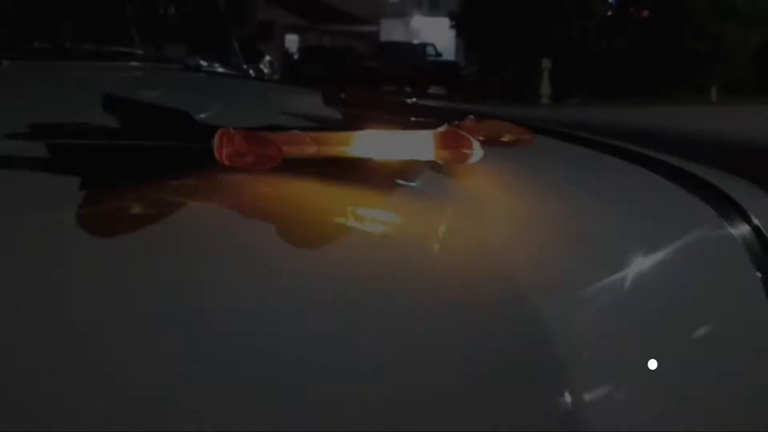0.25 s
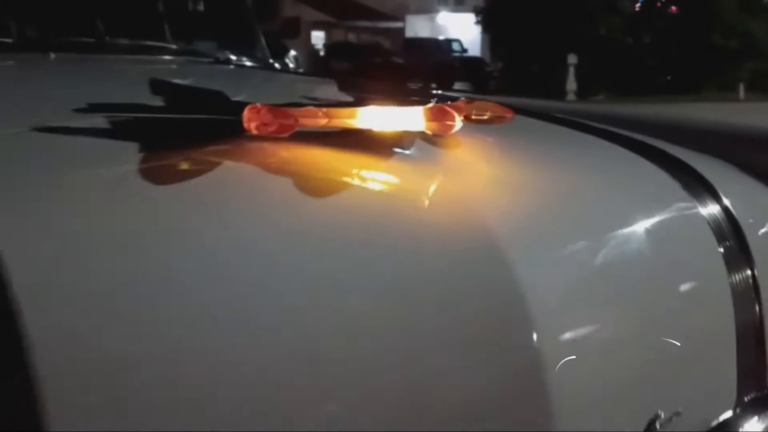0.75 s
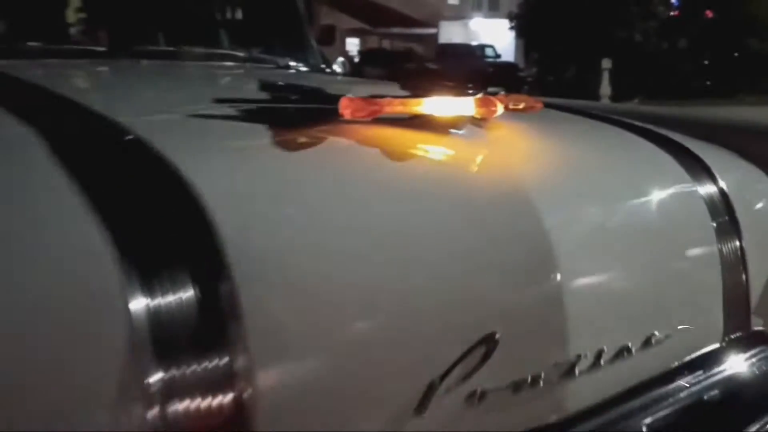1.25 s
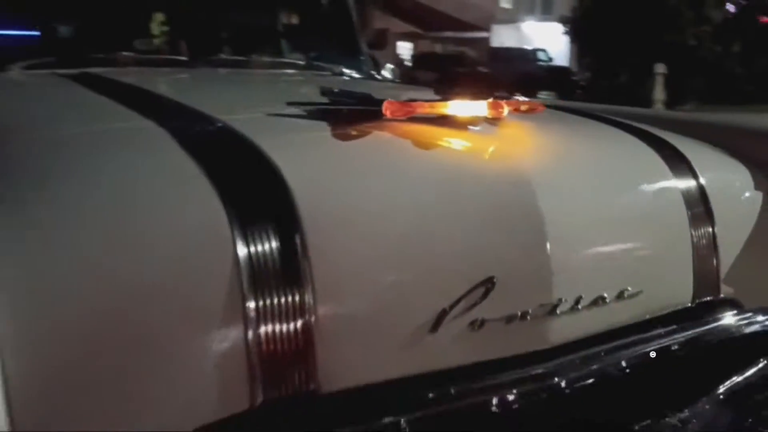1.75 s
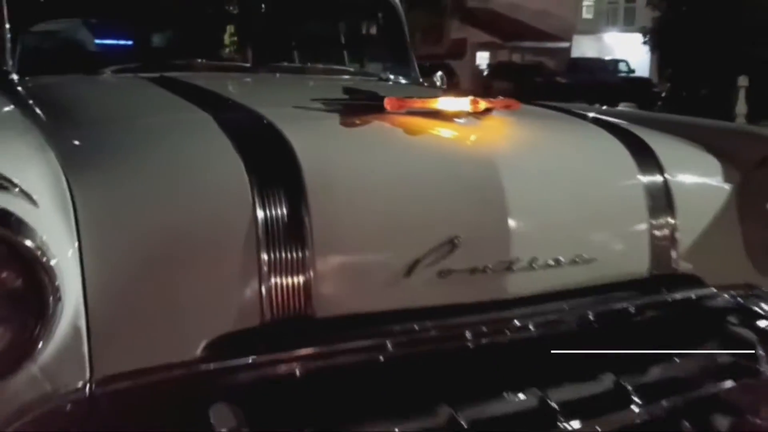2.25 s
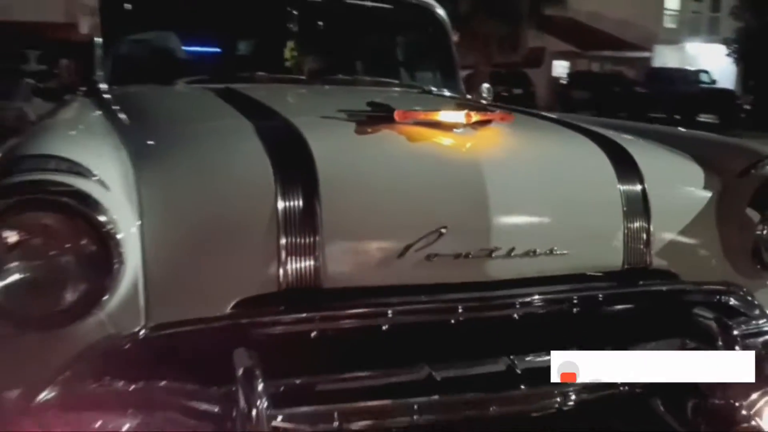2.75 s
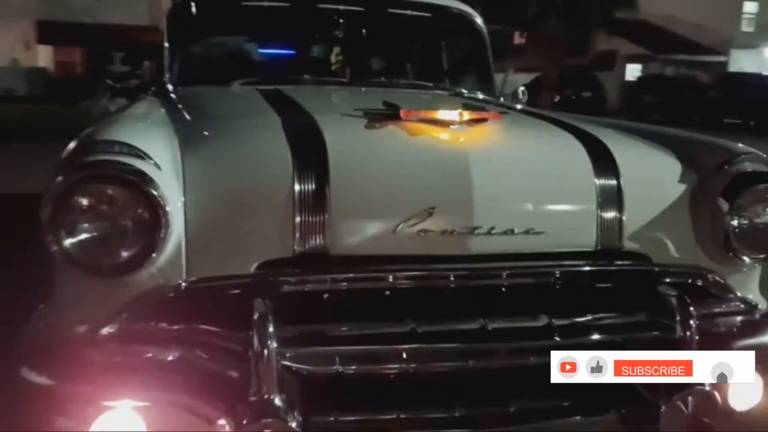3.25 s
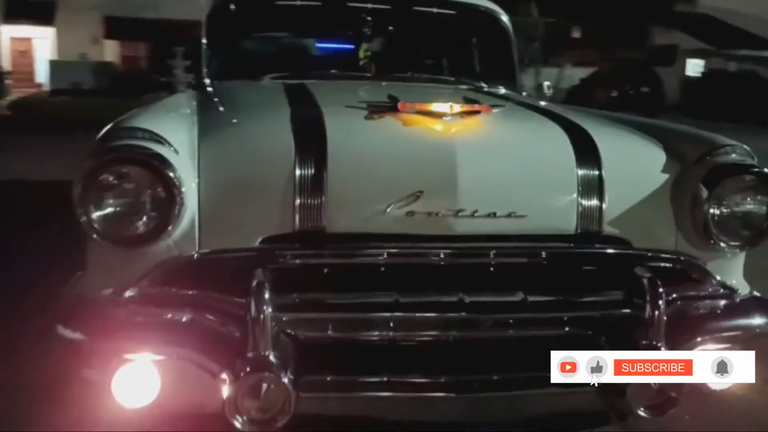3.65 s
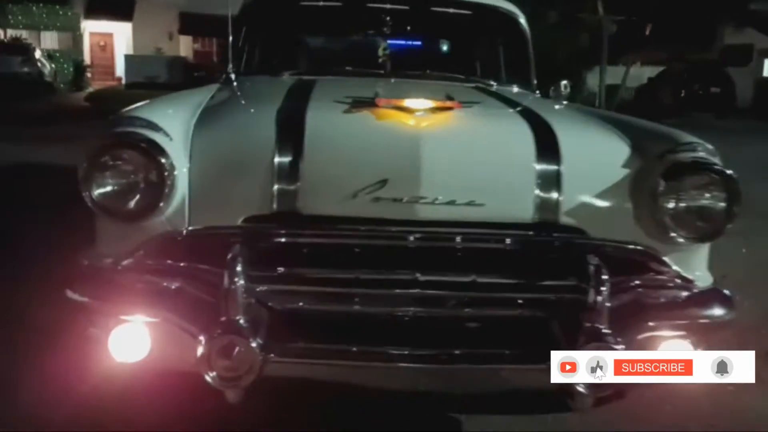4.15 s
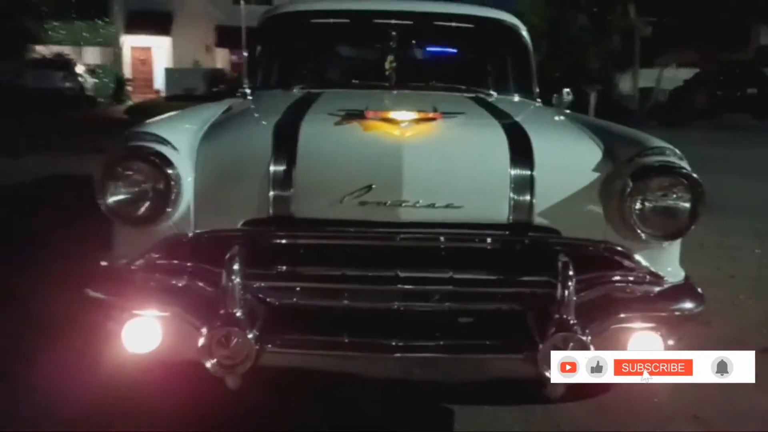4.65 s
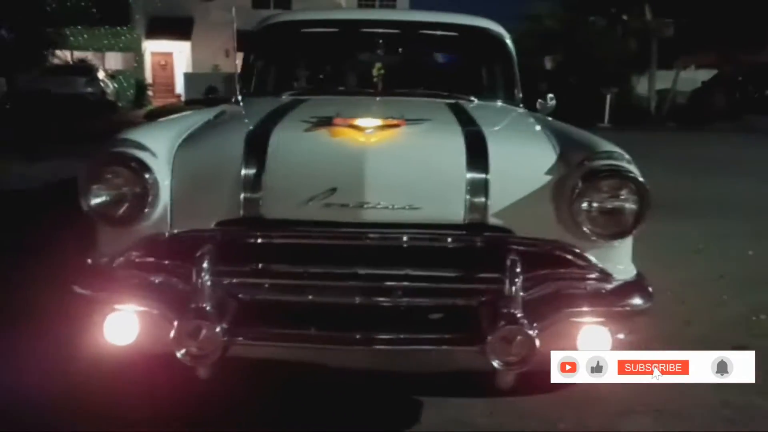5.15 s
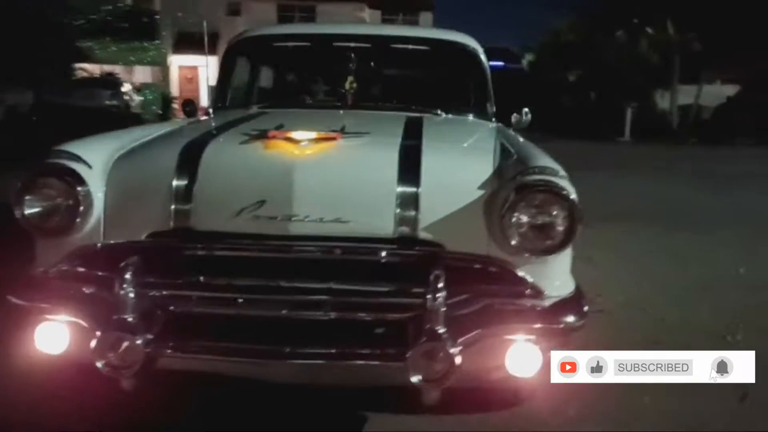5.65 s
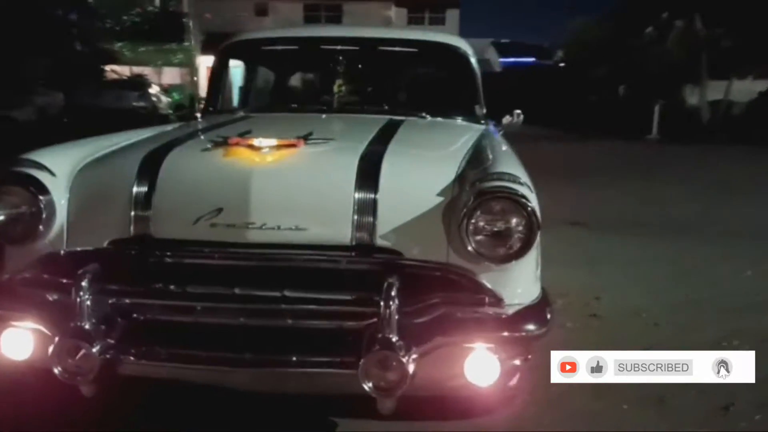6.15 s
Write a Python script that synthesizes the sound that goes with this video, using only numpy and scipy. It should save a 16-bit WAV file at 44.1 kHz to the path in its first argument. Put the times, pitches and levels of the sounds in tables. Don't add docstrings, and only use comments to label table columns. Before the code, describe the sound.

Outdoors at night, an old eight-cylinder engine idles throughout, heard by a hand-held stereo microphone close to the grille. The sound fades in over roughly the first half second, with a sharp isolated click near 0.3 s. Low exhaust pulses repeat about five lumpy cycles a second, some strong, some almost missing, beneath steady fan and intake roar, airy hiss and very faint belt whistle. Around 0.8 s a tight cluster of bright pebble ticks and grit crunches occurs. The engine is nearest until about 1.3 s, then gradually recedes. Near 1.5 s a second motor's low, buzzing drone emerges from behind the car, strongest around 3-4 s, then weakening and sinking slightly. Soft scuffs and clicks gather from 2.5 to 3.2 s with dull handling rumble; the hardest stone snap comes at 3.75 s, more ticks near 4.6 s and 5.7 s. The idle continues to the end at 6.4 s.

```python
import sys
import numpy as np
from scipy import signal
from scipy.io import wavfile

SR = 44100
rng = np.random.default_rng(int(sys.argv[2]) if len(sys.argv) > 2 else 0)


def bounce(signal):
    frames = np.transpose(np.atleast_2d(signal))
    limited = np.clip(frames, -1, 1)
    pcm = np.round(limited * 32767).astype(np.int16)
    wavfile.write(sys.argv[1], SR, pcm)


def volts(x):
    e = np.asarray(x, float) / 20
    return 10 ** e


N = 283077

HANDLING_DB, HANDLING_HZ, HANDLING_S, HANDLING_WIDTH_S = -41, 45.6, 2.8, 0.49

# (time [s], shaft rate [turns/s])
SHAFT_SPEED = [(0, 23.36), (.4, 24.14), (.8, 23.29), (1.2, 23.89), (1.6, 24.87), (2, 24.42), (2.3, 23.72),
               (2.6, 23.4), (2.9, 23.85), (3.2, 24.34), (3.5, 23.85), (3.8, 23.85), (4.2, 23.59),
               (4.7, 23.41), (5.1, 23.47), (5.5, 23.07), (5.9, 22.75), (6.42, 22.48)]
# (time [s], level [dB])
SHAFT_LOAD = [(0, 0), (1.6, -1), (2.4, 0), (2.9, 3), (4.0, 3.5), (4.6, 1.5), (5.1, .5), (5.6, -2.5),
              (6.42, -3)]
# (multiple of the shaft rate [-], level [dB], polarity [+-1], share hidden by the car [-])
BUZZ = [(2, -12, 1, 1), (5, 0, 1, 1), (6, -3.5, -1, 1), (7, -7.5, -1, 1), (8, -1, 1, .2)]
SHAFT_START_TURNS, BOOM_ORDER = .795, 4
BUZZ_DB, BOOM_DB = -33.5, -30.5
BUZZ_HIDDEN_DB, BOOM_HIDDEN_DB = -12, -7
CLEAR_S, CLEARING_S = 1.5, 0.1

# (time [s], bright [dB], dull [dB], thud [dB], size as pitch ratio [-])
SNAPS = [(.674, -40, -14, -40, 0.87), (0.775, 1, -40, -40, 0.8), (.786, -4, -40, -40, 1.05),
         (.802, 4, -40, -40, 0.86), (.824, -6, -10.5, -40, .95), (1.067, -40, -13, -40, .95),
         (2.143, -40, -22, -40, 0.63), (2.5124, -30, -2, -30, .82), (2.763, 1, -32, -40, 1.3),
         (2.895, -1, -40, -40, 1.05), (3.089, -40, -17, -40, .66), (3.192, -40, -17, -40, 0.59),
         (3.237, -40, -14, -40, .6), (3.7547, 11, 4.5, -1, 1.0), (3.964, -3, -40, -40, 0.88),
         (4.574, -40, -11, -40, .7), (4.598, 7, -24, -40, .97), (4.616, -3, -40, -40, 1.02),
         (4.724, 1, -40, -40, 1), (4.738, -1, -40, -40, 0.91), (5.714, 1, -40, -40, 1.0)]
# (frequency [Hz], level [dB], 60 dB decay time [s])
PEBBLE_BRIGHT = [(2600, -18, .004), (4400, -17, .004), (6800, -6, .005), (8300, 0, .0045),
                 (11500, -6, .004), (14000, -17, .004)]
# (frequency [Hz], level [dB], 60 dB decay time [s])
PEBBLE_DULL = [(900, 0, 0.007), (1150, 5, 0.0041), (1440, -1.5, 0.005)]
# (frequency [Hz], level [dB], 60 dB decay time [s])
PEBBLE_THUD = [(190, 13, .014)]
SNAP_LEAD = 14
# (time [s], length [s], level [dB], centre frequency [Hz])
SCUFFS = [(0.765, 0.046, -25.5, 7960), (0.794, 0.044, -24.5, 8400), (0.816, 0.06, -32, 8740),
          (2.556, 0.18, -33, 6300), (2.657, 0.18, -31, 5700), (2.874, 0.19, -36, 7900),
          (3.196, 0.17, -33, 6900), (3.856, .05, -35, 8000), (3.945, 0.16, -28, 8650),
          (4.389, 0.1, -32, 7700), (4.705, 0.12, -38, 7900), (5.657, 0.11, -29.5, 8450),
          (6.127, 0.15, -39.5, 1380), (6.259, 0.094, -43, 1380), (4.3, 0.24, -37, 3650)]

# (frequency [Hz], width [Hz], level [dB])
WHISTLES = [(1177, 45, -51), (1330, 60, -55), (1460, 60, -57), (3651, 14, -60), (5708, 70, -55)]
BELT_LAG = -11
# (frequency [Hz], density [dB per Hz])
ROAR = [(25, -62), (60, -58), (85, -55), (103, -56), (125, -55.5), (145, -55), (200, -57.5), (228, -55),
        (260, -58.5), (320, -55), (355, -55.5), (385, -66.5), (420, -65), (460, -62.5), (510, -62),
        (570, -58), (650, -60.5), (900, -60), (1080, -68.5), (1500, -69), (2000, -75)]
# (frequency [Hz], density [dB per Hz])
HISS = [(1800, -75), (2400, -72), (3200, -72.5), (4200, -70.5), (5500, -69), (7000, -64.5), (8500, -66.5),
        (10500, -71), (16500, -77.5)]
# (frequency [Hz], left-right likeness [0..1])
LIKENESS = [(30, .9), (100, .93), (250, .86), (350, .9), (400, .86), (450, .72), (600, .62), (750, .43),
            (900, .38), (1000, .2), (1250, .32), (1500, .25), (2200, .45), (2800, .22), (3600, .14),
            (4600, .25), (6500, .2), (9000, .03)]
# (frequency [Hz], further lag of the left port [samples])
BEARING = [(140, 3), (240, -3), (360, 4), (450, 1), (560, -6), (750, -4), (950, -2), (1150, -10),
           (1400, -14), (1500, 13), (2400, 10), (4400, 11)]

# (crank angle [degrees of 720], level [dB])
CYLINDERS = [
    (19.8, -2.2),
    (123.7, -6.5),
    (201.6, 1.7),
    (308.1, 4.9),
    (409.2, 1.0),
    (464.3, 5.9),
    (558.7, -12.8),
    (647.0, -1.7),
]
# (frequency [Hz], width [Hz], level [dB])
EXHAUST = [(41.6, 4, -29), (83.6, 4, -8.5), (103.6, 5.5, -0.8), (135.6, 13, -23), (155.5, 5, -11),
           (171.4, 4, -17), (199.4, 2.5, -19.5), (210.3, 3, -14), (235.7, 25, -30), (309.3, 3, -22)]
EXHAUST_SIGNS = [1, -1, 1, -1, 1, -1, 1, -1, 1, -1]
CYCLES_PER_S, FIRST_CYCLE = 5.241, .013
# (time [s], lead [cycles])
HUNT = [(0, 0), (.4, .008), (.8, .008), (1.05, .014), (1.3, .004), (1.65, -.016), (2.2, -.003), (2.6, .002),
        (3.1, .018), (3.35, .013), (3.85, -.008), (4.1, 0), (4.5, .009), (5.05, .006), (5.3, .01),
        (6.0, .002), (6.42, 0)]
INTAKE_HZ, INTAKE_WIDTH_HZ, INTAKE_DB, INTAKE_S, INTAKE_NEAR_S = 309.3, 3, -24, .6, .5
FIRING_HZ, FIRING_GAIN_DB, FIRING_FROM_S, FIRING_RISE_S = 83.6, 8, 4.0, .2

# (time [s], gain [dB])
RETREAT = [(0, -4), (.5, -0.5), (.85, 1.5), (1.05, 0.5), (1.3, 1.5), (2.1, -2), (2.6, -2), (3.2, -4.5),
           (3.6, -4.5), (3.9, -6), (4.5, -5), (5.0, -6), (5.6, -6.5), (6.42, -6.5)]
EXHAUST_DB, ROAR_DB, HISS_DB, WHISTLE_DB = -18, -29, -30, 7.5
ROAR_FOLLOWS, HISS_FOLLOWS = 0.35, 0.11
DULL_HZ, DULL_FOLLOWS = 10800, 0.69
FACING_S, FACING_WIDTH_S, FACING_DB = 2.95, 0.48, 2.0
LOWS_FROM_DB, LOWS_FADE_S = -5.5, 0.24
NOISE_FROM_DB, NOISE_FADE_S = -10, 0.42

# (frequency [Hz], width [Hz], level [dB])
LEFT_PORT = [(397, 96, 1.9), (536, 120, -1), (1960, 300, 0.8), (3090, 680, 6.5), (8650, 940, 6.5),
             (13700, 7100, -9), (15600, 1000, -3)]
LEFT_LAG = 50
JUMP_S, JUMP_DB = .275, [[-13.5], [-18]]
JUMP_FADE_S, JUMP_EDGE_S = .0016, .00007
CUTOFF_HZ = 16250


def rms_one(x):
    return x / np.sqrt(np.mean(x ** 2) + 1e-20)


def in_time(rows):
    s, *columns = np.transpose(rows)
    return [np.interp(np.arange(N) / SR, s, column) for column in columns]


def at_hz(points, hz):
    table_hz, value = np.transpose(points)
    return np.interp(np.log(hz), np.log(table_hz), value)


def fade_in(from_db, tau_s):
    return 1 - (1 - volts(from_db)) * np.exp(-np.arange(N) / SR / tau_s)


def bump(at_s, width_s):
    return np.exp(-.5 * ((np.arange(N) / SR - at_s) / width_s) ** 2)


def step_on(at_s, rise_s):
    return 1 / (1 + np.exp((at_s - np.arange(N) / SR) / rise_s))


def drift(rate):
    r = np.exp(-80 * np.pi * rate / SR)
    white = rng.standard_normal(N // 40 + 2002)
    slow = rms_one(signal.lfilter([1], [1, -2 * r, r * r], white)[2000:])
    return np.interp(np.arange(N) / 40, np.arange(len(slow)), slow)


def resonate(x, hz, width_hz):
    r = np.exp(-np.pi * width_hz / SR)
    poles = [1, -2 * r * np.cos(2 * np.pi * hz / SR), r * r]
    return signal.lfilter([(1 - r * r) / 2, 0, (r * r - 1) / 2], poles, x)


def handling():
    white = rng.standard_normal((3, N))
    shaking = white[0] + 0.25 * white[1:]
    rumble = resonate(resonate(shaking, HANDLING_HZ, 30.0), HANDLING_HZ, 30.0)
    return volts(HANDLING_DB) * rms_one(rumble) * (0.79 + bump(HANDLING_S, HANDLING_WIDTH_S))


def drone():
    turn = 2 * np.pi * (SHAFT_START_TURNS + np.cumsum(in_time(SHAFT_SPEED)[0]) / SR)
    hidden = 1 - step_on(CLEAR_S, CLEARING_S)
    boom_db = BOOM_DB + BOOM_HIDDEN_DB * hidden + 1.2 * drift(2.0)
    boom = volts(boom_db) * np.cos(BOOM_ORDER * turn)
    buzz = 0
    for order, db, sign, share in BUZZ:
        line_db = db + share * BUZZ_HIDDEN_DB * hidden + 1.86 * drift(2.2)
        buzz = buzz + sign * volts(line_db) * np.cos(order * turn)
    return np.sqrt(2) * volts(in_time(SHAFT_LOAD)[0]) * (boom + volts(BUZZ_DB) * buzz)


def snaps():
    out = np.zeros(N + 2000)
    click = np.eye(1, 2000)[0]
    for s, *strengths, size in SNAPS:
        i = int(s * SR)
        for modes, blow_db in zip((PEBBLE_BRIGHT, PEBBLE_DULL, PEBBLE_THUD), strengths):
            for hz, db, t60 in modes:
                r = volts(-60 / (t60 * SR))
                w = 2 * np.pi * hz * size / SR
                ring = signal.lfilter([0, np.sin(w)], [1, -2 * r * np.cos(w), r * r], click)
                ring = resonate(ring, hz * size, hz / 2)
                out[i:i + 2000] += volts(blow_db + db - 15.0) * ring
    return np.array([np.roll(out[:N], -SNAP_LEAD), out[:N]])


def scuffs():
    out = np.zeros((2, N))
    span = SR // 4
    for s, length, db, hz in SCUFFS:
        chance = rng.random((4, span))
        sizes = volts(-3.0 * np.log(chance[1] + 0.0013))
        grains = (chance[0] < 9000 / SR) * sizes * np.sign(chance[2] - .5)
        scatter = signal.lfilter(chance[3, :60] - .5, 1, grains)
        pair = np.array([rms_one(scatter) + .5 * rms_one(grains), rms_one(grains)])
        band = [hz * .74, min(hz * 1.75, 16000)]
        crunch = signal.sosfilt(signal.butter(2, band, "band", fs=SR, output="sos"), pair)
        phase = np.clip(np.arange(span) / (length * SR), 0, 1)
        burst = volts(db) * rms_one(crunch) * np.sin(np.pi * phase ** 0.98) ** 0.93
        i = int(s * SR)
        out[:, i:i + span] += burst[:, :N - i]
    return out


def whistles():
    white = rng.standard_normal((3, N))
    shared = np.array([np.roll(white[0], BELT_LAG), white[0]])
    pair = .6 * shared + white[1:]
    out = 0
    for hz, width, db in WHISTLES:
        tone = resonate(resonate(pair, hz, width), hz, width)
        out = out + volts(db + 0.5 * drift(2.1)) * rms_one(tone)
    return out


def turbulence(spectrum, count, shared_db, patchy_db, rate):
    out = 0
    together = drift(rate / 4)
    edges = np.geomspace(spectrum[0][0], spectrum[-1][0], count + 1)
    white = rng.standard_normal((2, 2, N))
    for k, (low, high) in enumerate(zip(edges, edges[1:])):
        band = signal.butter(2, [low, high], "band", fs=SR, output="sos")
        mid, side = signal.sosfilt(band, white[k % 2])
        hz = np.sqrt(low * high)
        alike = np.clip(at_hz(LIKENESS, hz), 0, 1)
        gain = volts(at_hz(spectrum, hz) + shared_db * together + patchy_db * drift(rate))
        common, opposed = np.sqrt(1 + alike) * mid, np.sqrt(1 - alike) * side
        left, right = gain * (common + opposed * [[1], [-1]])
        out = out + np.array([np.roll(left, round(at_hz(BEARING, hz))), right])
    return rms_one(out)


def exhaust(uneven_db, late_s):
    s = np.arange(0, N, 441) / SR
    cycles = FIRST_CYCLE + CYCLES_PER_S * s + np.interp(s, *np.transpose(HUNT))
    degrees, level_db = np.transpose(CYLINDERS)
    firings = np.arange(int(cycles[-1]) + 1)[:, None] + degrees / 720
    chance = rng.standard_normal((2,) + firings.shape)
    at = (np.interp(firings, cycles, s) + late_s * chance[0]) * SR
    pulses = np.full(N, 1e-18)
    pulses[np.clip(at, 0, N - 1).astype(int)] = volts(level_db + uneven_db * chance[1])
    pulses = signal.lfilter(*signal.butter(2, 600, fs=SR), pulses)
    intake = resonate(pulses, INTAKE_HZ, INTAKE_WIDTH_HZ)
    out = -volts(INTAKE_DB) * bump(INTAKE_S, INTAKE_NEAR_S) * intake
    for (hz, width, db), sign in zip(EXHAUST, EXHAUST_SIGNS):
        out = out + sign * volts(db) * resonate(pulses, hz, width)
    return rms_one(out)


def scene():
    feet = scuffs() + snaps() + handling()
    retreat_db, = in_time(RETREAT)
    bay = volts(ROAR_FOLLOWS * retreat_db)
    roar = volts(ROAR_DB) * bay * turbulence(ROAR, count=22, shared_db=.5, patchy_db=1.4, rate=5.5)
    hiss_db = HISS_DB + HISS_FOLLOWS * retreat_db + FACING_DB * bump(FACING_S, FACING_WIDTH_S)
    hiss = volts(hiss_db) * turbulence(HISS, count=16, shared_db=.5, patchy_db=1.4, rate=28.4)
    dull = signal.lfilter(*signal.butter(1, DULL_HZ, fs=SR), hiss)
    hiss = dull + volts(DULL_FOLLOWS * retreat_db) * (hiss - dull)
    noise = roar + hiss + volts(WHISTLE_DB) * bay * whistles()
    car = volts(EXHAUST_DB + retreat_db) * exhaust(uneven_db=1.5, late_s=0.00017)
    freed = step_on(FIRING_FROM_S, FIRING_RISE_S)
    car = car + (volts(FIRING_GAIN_DB * freed) - 1) * resonate(car, FIRING_HZ, 8)
    lows = car + drone()
    return fade_in(LOWS_FROM_DB, LOWS_FADE_S) * lows + fade_in(NOISE_FROM_DB, NOISE_FADE_S) * noise + feet


def top_cut(x):
    return signal.sosfilt(signal.butter(12, 15950, fs=SR, output="sos"), x)


def record(dry):
    left = np.roll(dry[0], LEFT_LAG)
    for hz, width, db in LEFT_PORT:
        left = left + (volts(db) - 1) * resonate(left, hz, width)
    since = np.arange(N) / SR - JUMP_S
    jump = -volts(JUMP_DB) * np.tanh(since / JUMP_EDGE_S) * np.exp(-np.abs(since) / JUMP_FADE_S)
    low_pass = signal.cheby2(12, 60, CUTOFF_HZ, fs=SR, output="sos")
    mix = signal.sosfilt(low_pass, np.array([left, dry[1]]) + jump)
    return top_cut(mix)


dry = scene()
out = record(dry)
bounce(out)
```